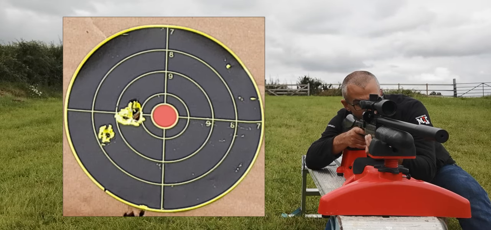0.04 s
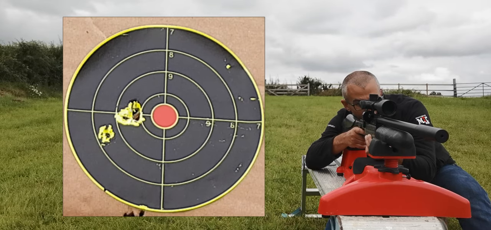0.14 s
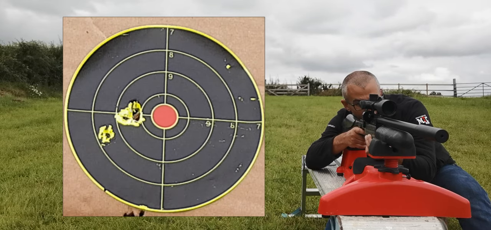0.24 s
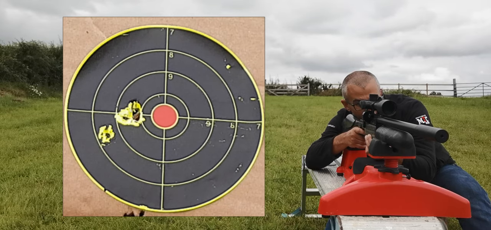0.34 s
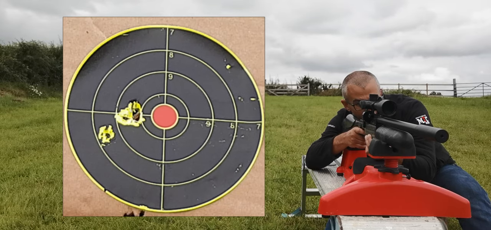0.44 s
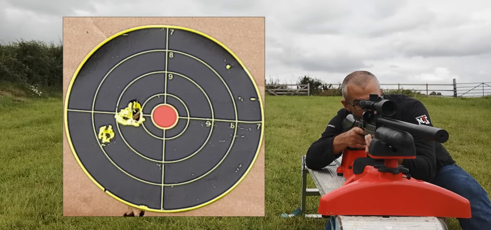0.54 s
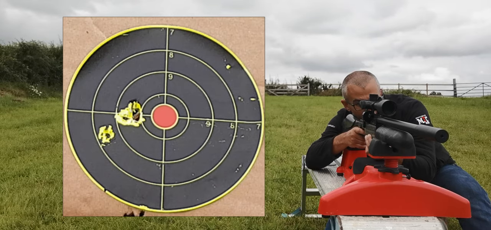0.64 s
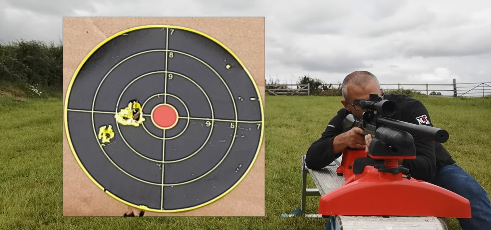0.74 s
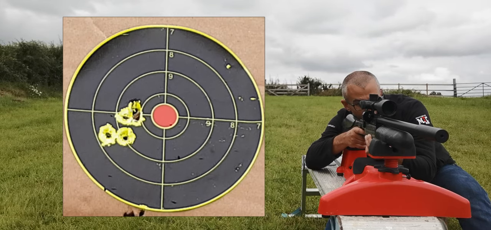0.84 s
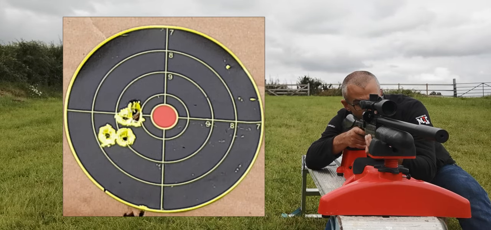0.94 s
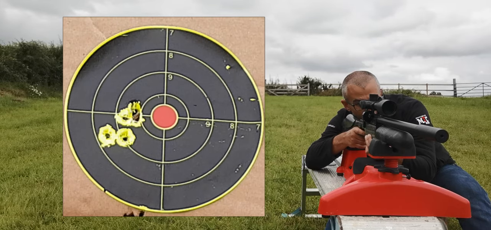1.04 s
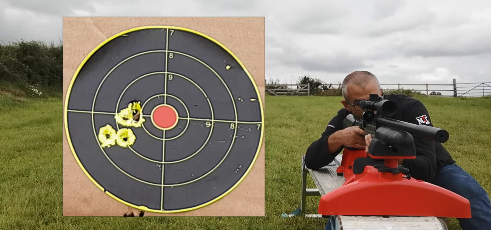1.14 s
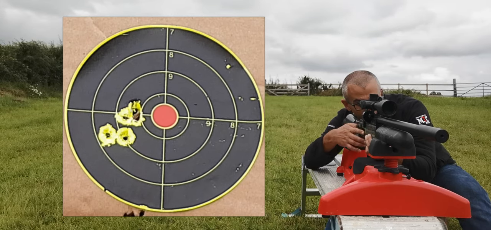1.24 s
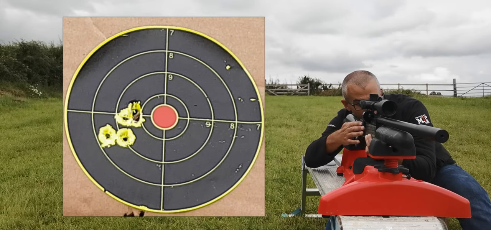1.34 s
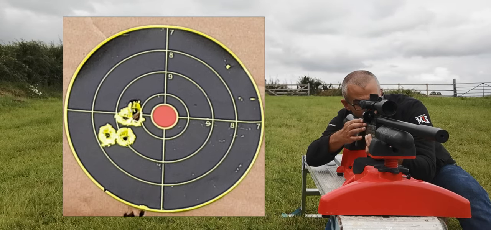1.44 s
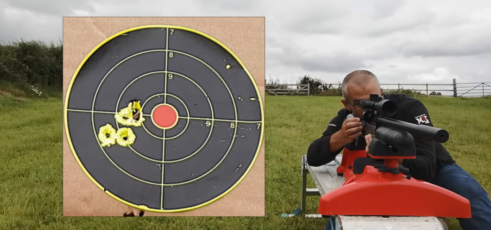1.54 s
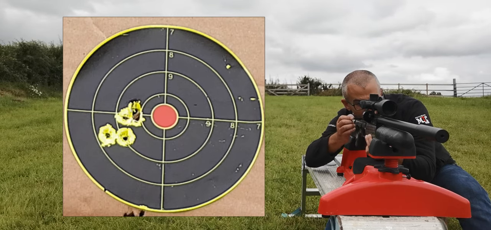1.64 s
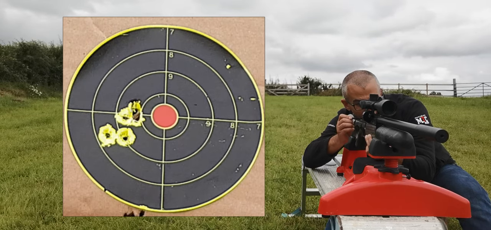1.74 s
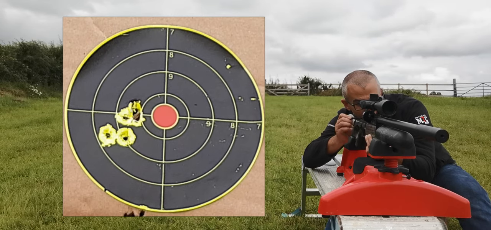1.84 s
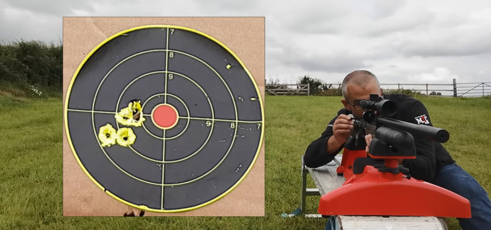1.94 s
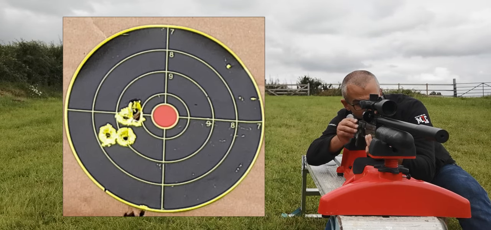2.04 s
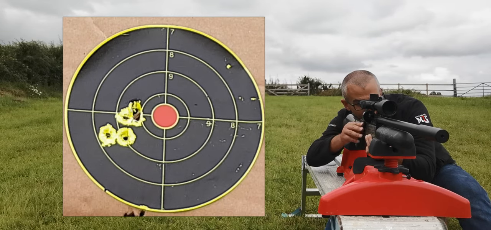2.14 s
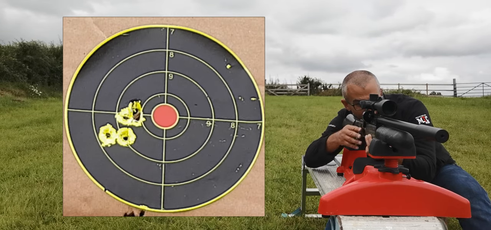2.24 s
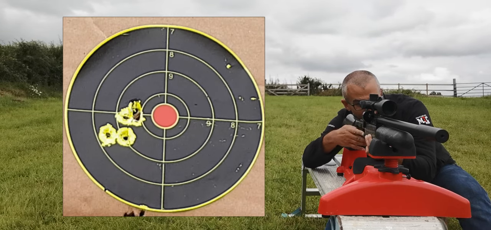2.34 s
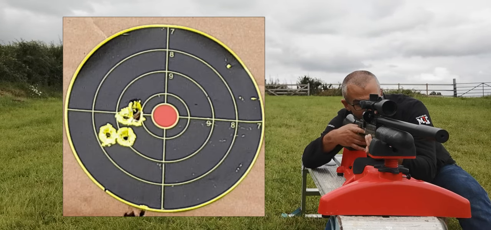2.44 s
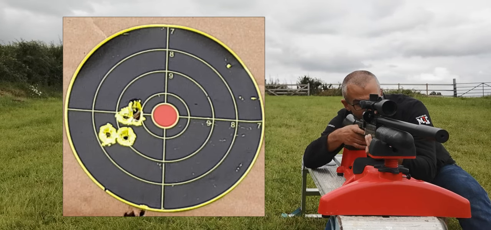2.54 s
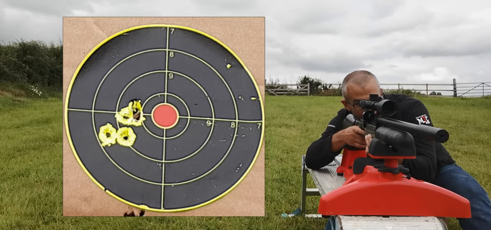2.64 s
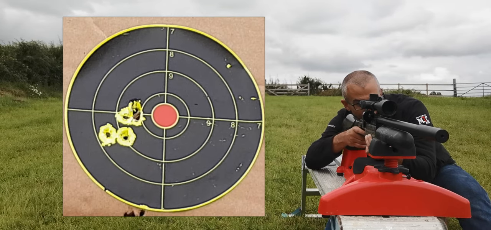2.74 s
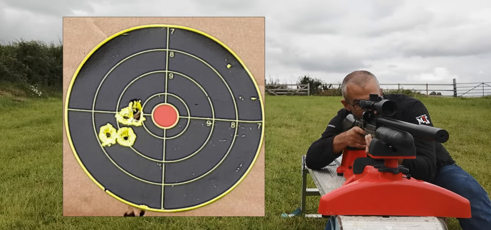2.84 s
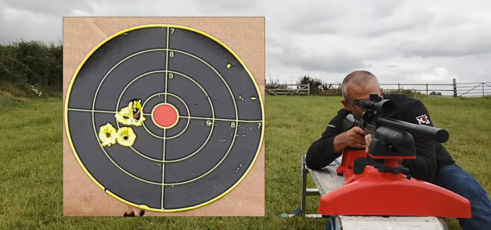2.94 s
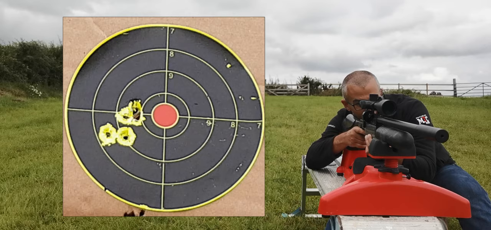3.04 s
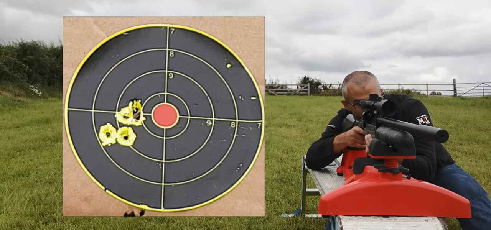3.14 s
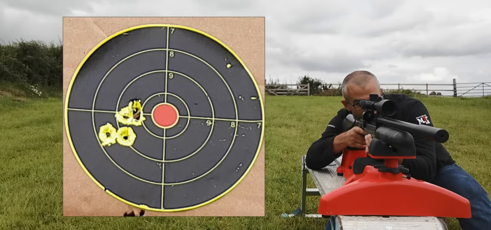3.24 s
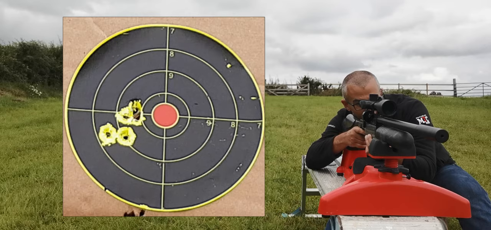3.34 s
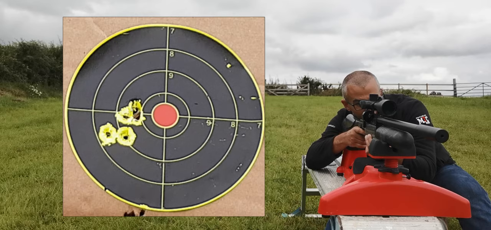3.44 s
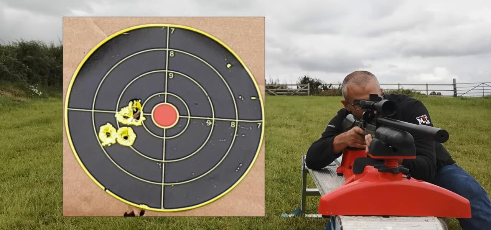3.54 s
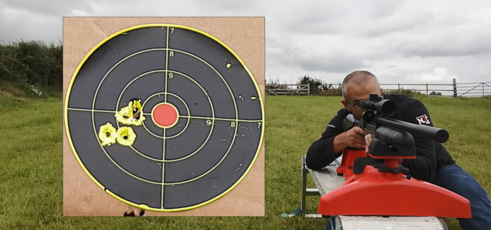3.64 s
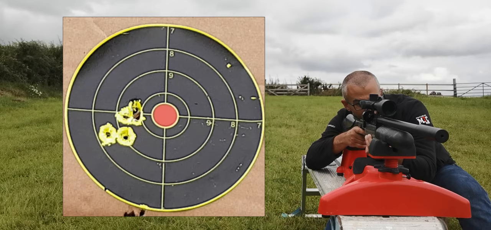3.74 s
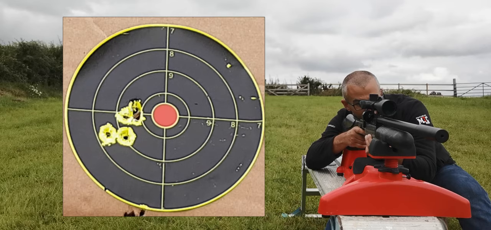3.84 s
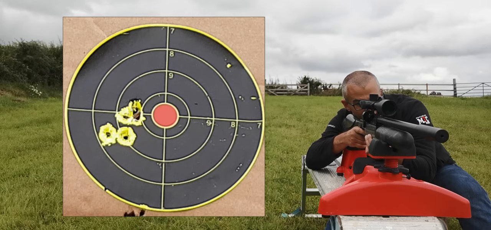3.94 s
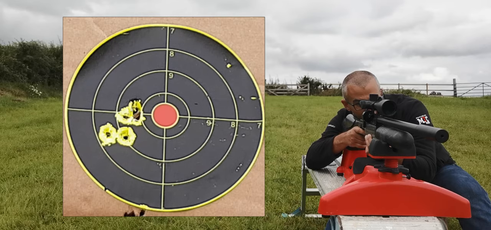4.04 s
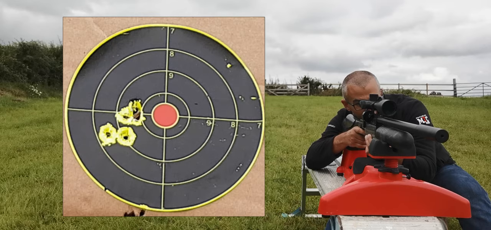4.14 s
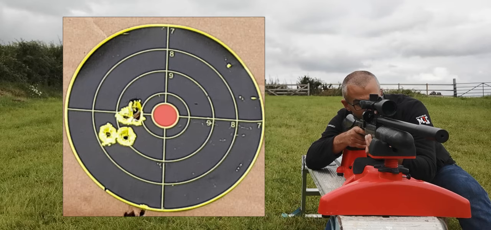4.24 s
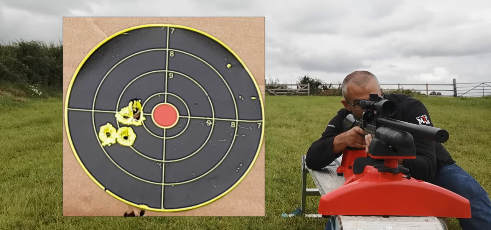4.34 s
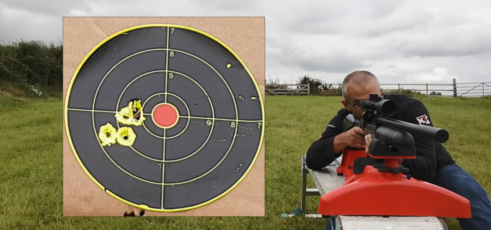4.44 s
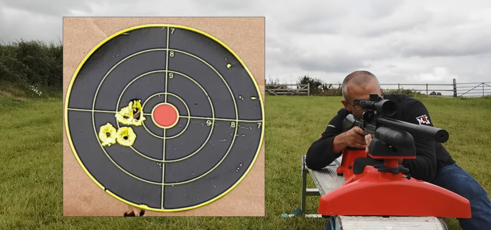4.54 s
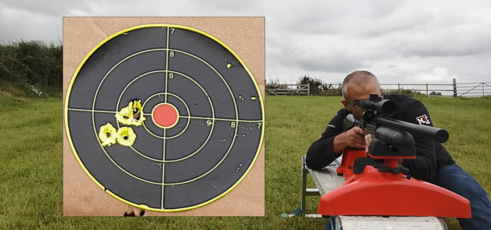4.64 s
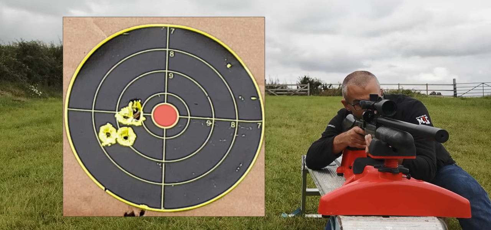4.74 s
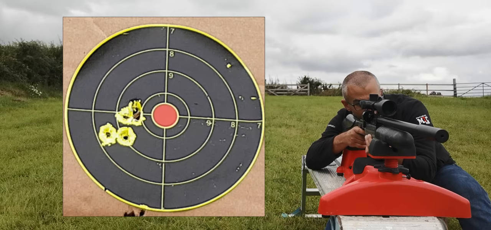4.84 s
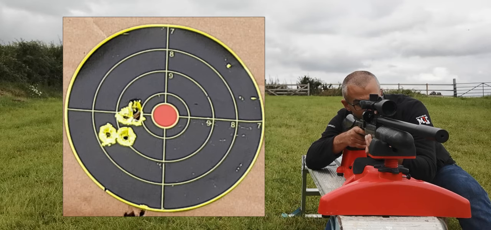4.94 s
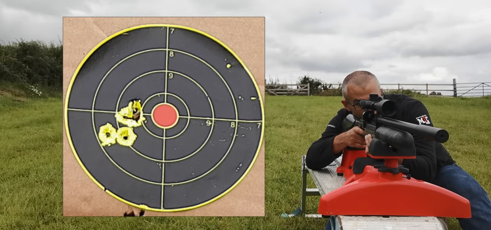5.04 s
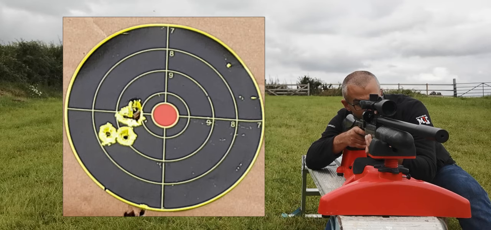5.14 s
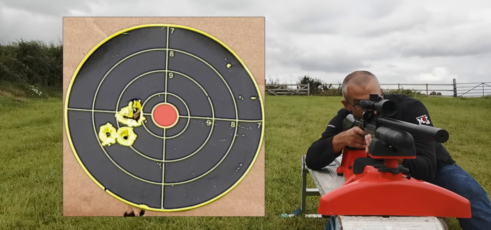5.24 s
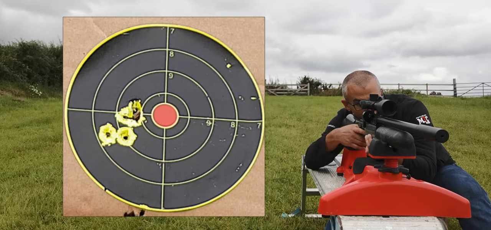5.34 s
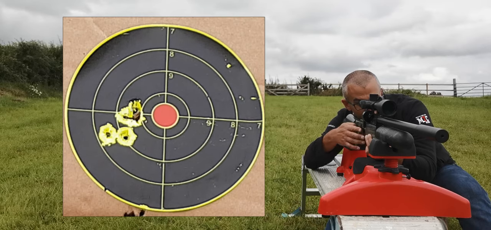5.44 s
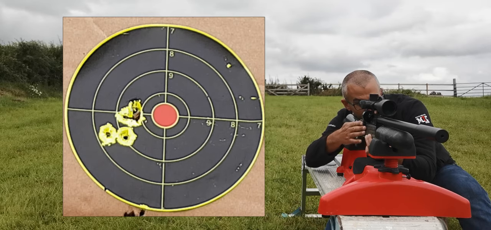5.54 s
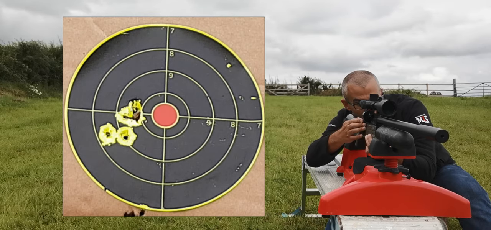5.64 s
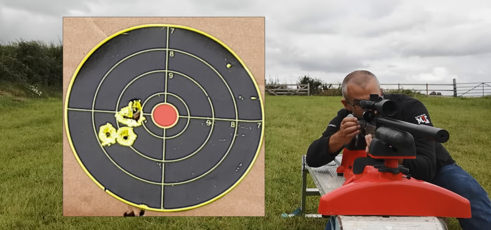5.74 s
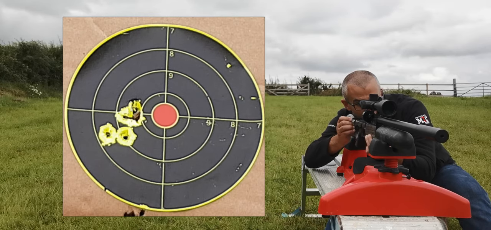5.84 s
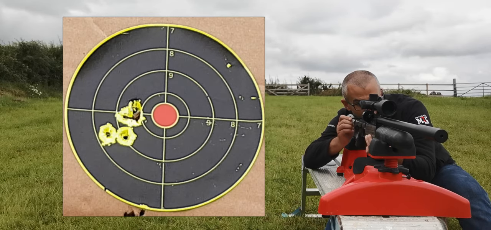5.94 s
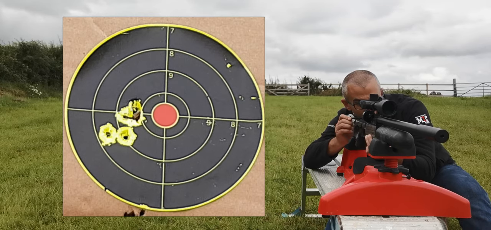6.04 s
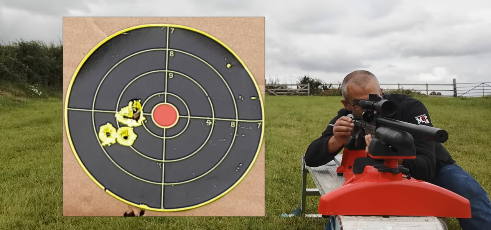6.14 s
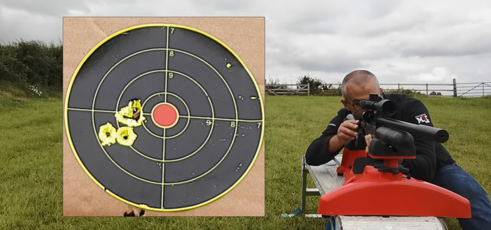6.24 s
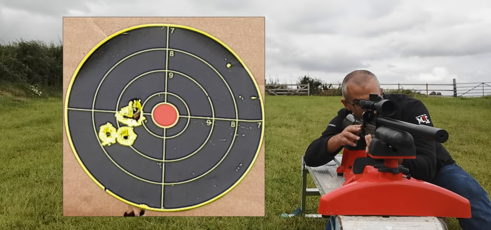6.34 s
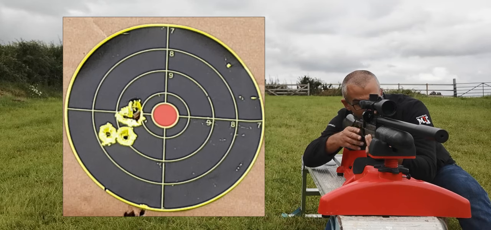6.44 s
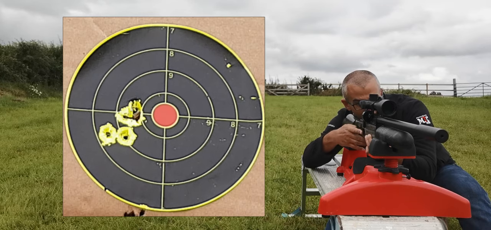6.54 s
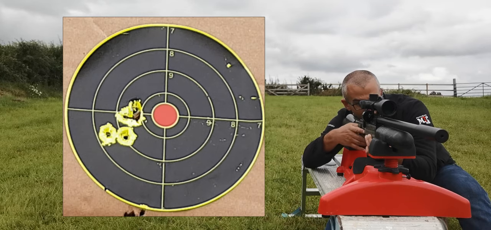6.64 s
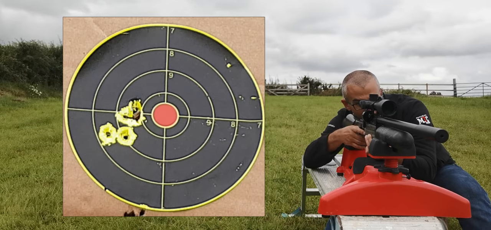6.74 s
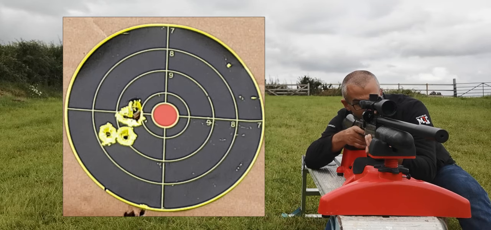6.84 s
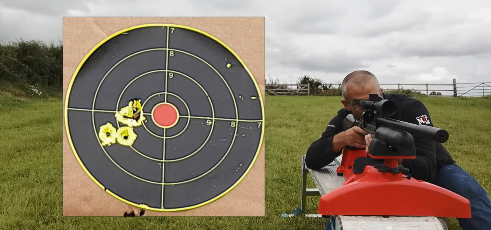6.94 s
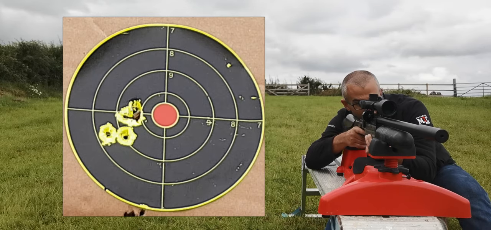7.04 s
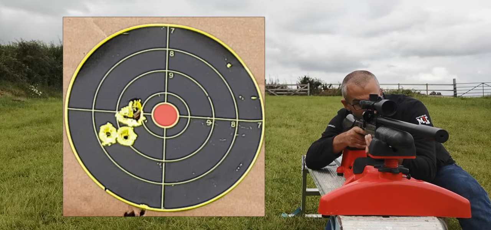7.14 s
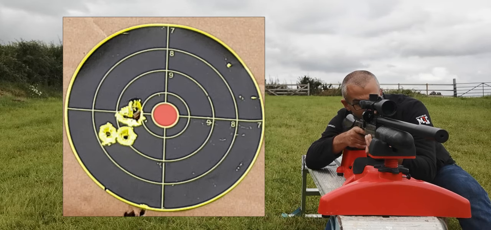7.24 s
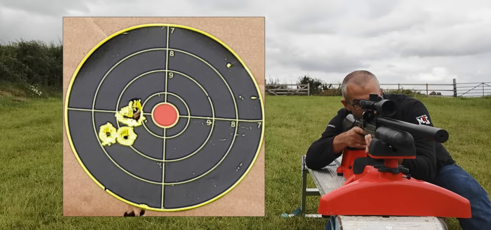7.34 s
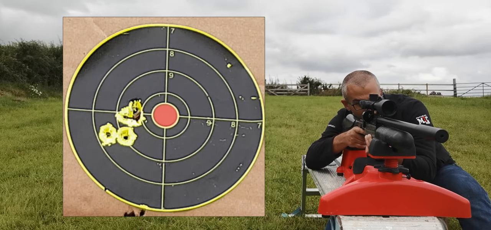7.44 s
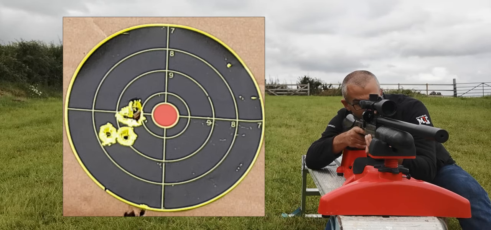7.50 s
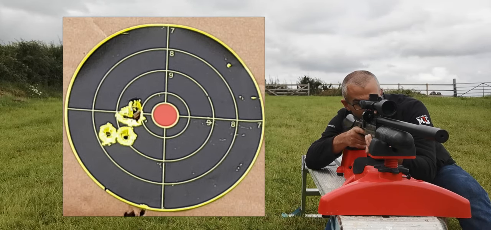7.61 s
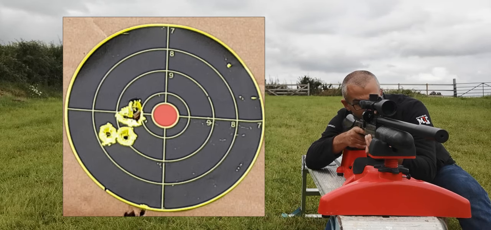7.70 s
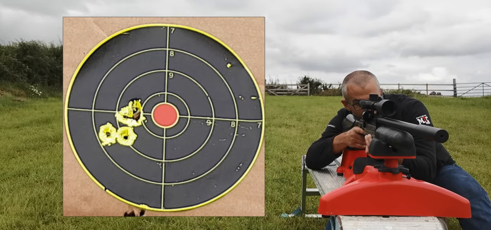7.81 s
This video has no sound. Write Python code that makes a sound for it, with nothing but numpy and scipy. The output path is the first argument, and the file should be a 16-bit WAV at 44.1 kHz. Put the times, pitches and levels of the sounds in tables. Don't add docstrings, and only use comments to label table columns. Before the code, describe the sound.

Two muffled air rifle shots, each followed at once by a booming metallic pellet-trap hit, with bolt clicks between and wind rumbling over an open field.

```python
import sys
import numpy as np
from scipy import signal
from scipy.fft import rfft, irfft, next_fast_len
from scipy.io import wavfile

SR = 44100
rng = np.random.default_rng(int(sys.argv[2]) if len(sys.argv) > 2 else 0)


def linear_from_db(decibels):
    return 10 ** (np.asarray(decibels, float) / 20)


def wrap_up_sound(samples):
    columns = np.atleast_2d(samples).T
    tamed = np.clip(columns, -1, 1)
    steps = np.round(tamed * 32767).astype(np.int16)
    wavfile.write(sys.argv[1], SR, steps)


N = 347067

# (blast time [s], valve tick [dB], sear tick [dB])
SHOTS = [
    (0.7053, -27.5, -50),
    (4.8423, -9, -34),
]
# (time after blast [ms], peak [dB], centre [Hz], t60 [ms], pan L-R [dB])
BLAST = [
    (0, -10.5, 4600, 13, -2),
    (-0.5, -8.5, 6230, 15, -12.5),
    (0, -16, 1290, 14.0, -1.5),
    (7, -30, 10500, 32.0, -4.5),
]
JET_WHISTLE = (1.2, -18.5, 14499.5, 10, -4)
# (time [s], peak [dB])
HAMMER = [
    (0.715, -22.5),
    (4.8504, -22),
]
# (frequency [Hz], level [dB], t60 [s])
TUBE = [(1350, -7.5, 0.02), (2745.7, -14, .04), (4164, -16.5, 0.14), (5340, -20, 0.05), (6780, -16, 0.083),
        (8412, -15, 0.028), (9524, -17, 0.047), (11100, -23.5, .03), (12525, -25, .06), (13900, -25, .036)]
# (time [s], peak [dB], t60 [ms], spring ring [dB])
BOLT = [(1.7491, -42, 27, -34), (1.756, -54, 120, -36), (1.7806, -56, 25, -32), (1.845, -52, 91, -24),
        (1.8606, -35.5, 23, -23.5), (1.873, -46, 33, -36), (1.8824, -42.5, 25, -19.5),
        (1.891, -56, 33, -36), (2.0184, -35.5, 23.4, -40), (2.0679, -38.5, 15, -28),
        (2.113, -51.5, 57, -18), (5.608, -39, 59, -36), (6.0222, -40.5, 28, -11.5), (6.1867, -34, 17, -32),
        (6.228, -45, 29, -19), (6.272, -54.5, 110, -32)]
LATCH_S = [2.2416, 6.4169]
# (time after latch [ms], peak [dB], centre [Hz], t60 [ms], spring ring [dB])
LATCH = [
    (-2.5, -32, 7200, 8.1, -16),
    (-1, -25.5, 5930, 25, -20.5),
    (6.5, -34, 5400, 5.5, -19),
    (58.5, -52.5, 3900, 55, -29),
]
# (frequency [Hz], level [dB], t60 [s])
ACTION = [(1730, 13, 0.014), (2250, 8, 0.012), (3240, -9, .01), (5200, -7.5, .11), (4800, -18, .06)]

PELLET_S = [0.849, 4.983]
# (time [s], mid [dB], low minus mid [dB], high minus mid [dB], decay factor [1])
TRAP_HITS = [
    (.849, -5, -9.5, -11, 0.74),
    (4.9734, -30, -6, -2, 0.93),
    (4.983, -7, -9.5, -10.5, 0.82),
    (5.2701, -48, -6, -3.5, 0.61),
    (5.3437, -43.5, 2, -10.5, 0.35),
    (5.5087, -39.5, -4, -30.5, 0.54),
    (5.608, -44, -7, -16, 0.53),
    (5.6704, -50, -9, -16, 0.38),
    (5.709, -56.5, 6.5, -9, .1),
    (5.8991, -30, -16, -21.5, 0.55),
]
# (time after arrival [ms], mid [dB], low minus mid [dB], high minus mid [dB], decay factor [1])
REPORT = [
    (0, -28, -23, -9.5, 0.13),
    (12, -42, -23, 2, .8),
]
# (time [s], mid [dB], low minus mid [dB], high minus mid [dB])
APPROACH = [
    (.79, -41, -14, -1.5),
    (.822, -38, -5, 2),
    (4.935, -40.5, -11.5, 0.5),
    (4.958, -29, -5, 3.5),
]
# (frequency [Hz], level [dB], t60 [s], left-right likeness [0..1])
TRAP = [(119.64, -13.5, .85, 0.85), (198, -8, 1, 0.39), (269.6, -8.5, 0.9, 1), (350, 2.5, 0.92, 0.74),
        (744, 2, 0.88, 0.63), (1090, 0, .65, 0.39), (2000, 3.5, 0.66, 0.45), (3800, -1.5, 0.51, 0.4),
        (6000, -1.5, 0.55, 0.1), (8500, -2.5, 0.31, .3), (11000, 0, .42, 0.085), (15500, -1, 0.33, 0.33)]
# (frequency [Hz], width [Hz], level [dB])
BOX = [(343, 40, 5), (528.3, 68, 4.5), (716, 50, 4), (758, 52, 6), (1160, 27, -0.5), (1415, 120, 5),
       (1903, 70, 3), (2650, 86, 5), (3110, 58, 3.5)]
# (frequency [Hz], first pellet [dB], second pellet [dB], t60 [s])
PANELS = [(266, -41.5, -43.5, 1.314), (347, -51, -45.5, 3.5), (472, -48.5, -55.5, 4.3),
          (510.7, -42, -30, 1.1), (532, -45.5, -35, 1.5), (584.6, -53, -39, 1.9), (618, -46, -53.5, 3.2),
          (748, -36.5, -42, .6), (772, -41, -41.5, 1.7), (1107.6, -39, -51.5, 1.1),
          (1360.4, -44.5, -46, 1.1), (1670, -43.5, -47.5, 0.66)]
# (frequency [Hz], level [dB], t60 [s])
PUNCH = [(205, -15.5, 0.041), (636, -12.5, .02)]
# (time [s], peak [dB], centre [Hz], t60 [ms])
KNOCKS = [
    (5.5089, -35.5, 1960, 70),
    (5.6085, -41, 5500, 20),
    (5.899, -24.5, 1580, 64),
    (5.55, -38, 820, 40),
]
# (time [s], low band [dB], middle band [dB], top band [dB], t60 [s])
FROM_AFAR = [
    (1.0065, -18, -14, -17.5, 0.45),
    (1.53, -55.5, -59, -69, 0.72),
    (1.621, -41, -52, -62, 0.28),
    (5.1415, -18.5, -20.5, -17.5, 0.44),
    (5.769, -49, -58, -55, 0.16),
    (6.041, -41.5, -52, -47.5, 0.19),
]

# (frequency [Hz], density [dB per Hz])
WIND_COLOUR = [(12, -36), (20, -2), (86, 1.5), (107, -2), (134, -1), (323, -24.5), (353, -18), (400, -21),
               (520, -51.5), (880, -120)]
# (time [s], rise over calm [dB], half length [s], pan L-R [dB])
GUSTS = [(.08, 11.5, 0.15, -5), (0.436, 11.5, 0.21, -5), (0.348, 9.5, 0.028, -0.5), (.78, 7.5, .12, 2),
         (1.082, 12.5, 0.11, -4), (2.518, 8, .27, 5.5), (3.35, 0, .06, -4), (3.797, 7, 0.23, -4),
         (4.547, 12, 0.25, -12), (4.668, 8, 0.015, -2.5), (4.756, 7, 0.031, 20), (5.16, 23, 0.12, -10.5),
         (5.688, -7, 0.14, -4), (6.014, 4, .06, -7), (6.779, -2.5, 0.088, 6), (7.001, 8, .07, 3),
         (7.274, 15.5, 0.13, 8), (7.5, 8, .12, 0), (7.8, 11.5, 0.18, 3)]
# (frequency [Hz], density [dB per Hz])
FIELD = [(120, -37.5), (200, -4), (254, -8.5), (434, -4.5), (542, -4.5), (728, -0.5), (860, -2), (997, -7),
         (1180, -6.5), (1900, -19), (3770, -30.5), (8650, -39), (15000, -34.5), (16500, -43.5)]
# (frequency [Hz], left-right likeness [0..1])
FIELD_LIKENESS = [(200, 0.22), (400, 0.79), (1400, .75), (2500, 0.19), (5000, .02)]

VALVE_LEAD_MS, SEAR_LEAD_MS = 2.2, 8.3
WARMING_PER_S, COLD_PITCH = 0.9, 0.98
BOLT_HZ, BOLT_PAN_DB = 5700, -6.5
GRAIN_S = 0.0016
RANGE_M, SOUND_M_PER_S = 20.15, 343
APPROACH_DECAY, APPROACH_RISE_MS, HIT_RISE_MS = 0.43, 18, 0.19
PATCH_S, PATCH_DB = 0.018, 1.5
AFAR_TOP_HZ, AFAR_RISE_MS = 7730, 0.43
EDDY_S, SWIRL_S, SWIRL_DB = 0.028, 0.062, 3
CALM_DB, FIELD_DB = -60, -53.5
DEEP_FOLLOWS, DEEP_HZ = 0.33, 45
BRIGHT_FOLLOWS, BRIGHT_HZ = 1.2, 140


def rifle():
    hammer_s = np.transpose(HAMMER)[0]
    push = ring(marks(hammer_s - 0.012, linear_from_db(-31.5)), 140, 0.035)
    push += ring(marks(hammer_s - 0.0095, linear_from_db(-26)), 480, 0.014)
    push += ring(marks(hammer_s - 0.009, linear_from_db(-25.5)), 1100, 0.015)
    rattles, jets = [], []
    for blast_s, valve_db, sear_db in SHOTS:
        rattles.append((blast_s - SEAR_LEAD_MS / 1000, sear_db, 5000, 22.0, -6))
        rattles.append((blast_s - VALVE_LEAD_MS / 1000, valve_db, 5000, 8.0, -8))
        rattles += [(blast_s + ms / 1000, *rest) for ms, *rest in BLAST]
        jets.append((blast_s + JET_WHISTLE[0] / 1000, *JET_WHISTLE[1:]))
    blasts = bursts(rattles, width_oct=0.6, top_hz=10700, rise_ms=0.3, grain_db=2.5)
    blasts += bursts(jets, width_oct=0.3, top_hz=16500, rise_ms=0.3, grain_db=1.0)
    return blasts + pan(air_tube(), -2.1) + pan(push, -8.5)


def air_tube():
    out, age_s = np.zeros(N), np.arange(SR // 5) / SR
    turns = COLD_PITCH * (age_s + WARMING_PER_S * age_s ** 2 / 2)
    modes = sum(linear_from_db(db + 4.5 - 60 * age_s / t60) * np.cos(2 * np.pi * hz * turns) for hz, db, t60 in TUBE)
    for s, peak_db in HAMMER:
        i = int((s + 0.00063) * SR)
        out[i:i + len(age_s)] += linear_from_db(peak_db) * modes
    return out


def bolt():
    rows = [(s, db, BOLT_HZ, t60_ms, BOLT_PAN_DB, ring_db) for s, db, t60_ms, ring_db in BOLT]
    for s in LATCH_S:
        rows += [(s + ms / 1000, db, hz, t60_ms, BOLT_PAN_DB, ring_db) for ms, db, hz, t60_ms, ring_db in LATCH]
    rows = np.array(rows)
    strikes = marks(rows[:, 0] + 0.00107, linear_from_db(rows[:, 1] + rows[:, 5]))
    rings = sum(linear_from_db(db) * ring(strikes, hz, t60) for hz, db, t60 in ACTION)
    clicks = bursts(rows, width_oct=0.53, top_hz=8600, rise_ms=0.41, grain_db=3.5)
    return clicks + pan(rings, -2.9)


def trap():
    hz, white = noise_pair(lambda f: at_hz(TRAP, f, axis=3), lag_s=0.00022)
    white = white * sheet_modes(hz, spacing_hz=22.27, depth_db=2.5)
    out, step = np.zeros((2, N)), 16
    t = np.arange(0, N + step, step) / SR
    sounds = trap_sounds()
    for centre in 110 * 2 ** np.arange(0, 7.3, 0.4):
        skirt = np.cos(np.clip(np.log2(hz / centre) / 0.4, -1, 1) * np.pi / 2)
        crack = linear_from_db(at_hz([(500, 1.0), (3000, 2.5), (11000, 6.5)], centre))
        bend = at_hz([(400, 1.3), (2500, 1.4), (9000, 1.0)], centre)
        band_db, band_t60 = at_hz(TRAP, centre), at_hz(TRAP, centre, axis=2)
        power = np.zeros(len(t))
        for s, mid_db, low_db, high_db, decay, rise_ms in sounds:
            tilt_db = at_hz([(600, low_db + 5.5), (3000, -2.5), (11000, high_db - 2.5)], centre)
            near = slice(int(s * SR / step), int((s + 1.5) * SR / step))
            tail = swell(t[near], s, decay * band_t60, rise_ms, bend)
            early = crack * swell(t[near], s, decay * 0.1115, rise_ms)
            power[near] += linear_from_db(2 * (mid_db + tilt_db + band_db)) * (tail ** 2 + early ** 2)
        power *= linear_from_db(2 * PATCH_DB * wander(t, PATCH_S)[0] - 1)
        envelope = np.interp(np.arange(N), t * SR, np.sqrt(power))
        out += envelope * irfft(white * skirt)[:, :N]
    return linear_from_db(4.8) * out


def trap_sounds():
    flight_s = RANGE_M / SOUND_M_PER_S
    rows = [(*row, HIT_RISE_MS) for row in TRAP_HITS]
    rows += [(*row, APPROACH_DECAY, APPROACH_RISE_MS) for row in APPROACH]
    for blast_s, *_ in SHOTS:
        rows += [(blast_s + flight_s + ms / 1000, *rest, max(HIT_RISE_MS, ms)) for ms, *rest in REPORT]
    return rows


def sheet_modes(hz, spacing_hz, depth_db):
    thicket = np.interp(hz, np.arange(3000) * spacing_hz, rng.standard_normal(3000))
    humps = sum(db / (1 + (2 * (hz - centre) / width) ** 2) for centre, width, db in BOX)
    return linear_from_db(depth_db * thicket + humps - 2)


def panels():
    out, knots = np.zeros(N), np.arange(0, N + 3000, 3000)
    for hz, first_db, second_db, t60 in PANELS:
        waver = linear_from_db(np.interp(np.arange(N), knots, 3.0 * rng.standard_normal(len(knots))))
        strikes = marks(PELLET_S, linear_from_db(np.array([first_db, second_db]) - 2.0))
        out += waver * ring(strikes, hz, t60)
    punches = marks(np.array(PELLET_S) - 0.0006, 0.88)
    out -= sum(linear_from_db(db) * ring(punches, hz, t60) for hz, db, t60 in PUNCH)
    return pan(out, -1.2)


def scraps():
    rows = [(*row, -1.5) for row in KNOCKS]
    return bursts(rows, width_oct=0.54, top_hz=12000, rise_ms=0.2, grain_db=2.0)


def from_afar():
    out, t = np.zeros((2, N)), np.arange(SR) / SR
    bands_hz = [[1100, 2760], [2700, 4600], [4200, AFAR_TOP_HZ]]
    for s, *levels_db, t60 in FROM_AFAR:
        noise = rng.standard_normal((3, 2, SR))
        i = int(s * SR)
        for part, edges, level_db, lasts in zip(noise, bands_hz, levels_db, [1.1, 0.85, 0.6]):
            band = signal.sosfilt(signal.butter(4, edges, "band", fs=SR, output="sos"), part)
            out[:, i:i + SR] += linear_from_db(level_db) * band * swell(t, 0, lasts * t60, AFAR_RISE_MS, bend=1.147)
    return out


def wind():
    t, sides = np.arange(N) / SR, np.array([[0.5], [-0.5]])
    hz, white = noise_pair(lambda f: 0 * f + 0.082, lag_s=0)
    colour_db = at_hz(WIND_COLOUR, hz) - 12 * np.log2(np.maximum(hz / 400, 1))
    white = white * linear_from_db(colour_db - 5 * np.log2(np.maximum(45 / hz, 1)))
    deep_share = 1 / (1 + (hz / DEEP_HZ) ** 4)
    bright_share = 1 - 1 / (1 + (hz / BRIGHT_HZ) ** 4)
    shares = (deep_share, 1 - deep_share - bright_share, bright_share)
    deep, upper, bright = (irfft(white * share)[:, :N] for share in shares)
    gust_db = 0
    for s, db, half_s, pan_db in GUSTS:
        gust_db = gust_db + (db + pan_db * sides) * np.exp(-np.abs((t - s) / half_s) ** 3)
    lumps = linear_from_db(4.5 * np.clip(wander(t, EDDY_S), -2, 2.2) + SWIRL_DB * wander(t, SWIRL_S))
    rumble = deep * linear_from_db(DEEP_FOLLOWS * gust_db + 3.0)
    rumble += upper * linear_from_db(gust_db)
    rumble += bright * linear_from_db(BRIGHT_FOLLOWS * gust_db - 1.5)
    calm_rms = np.sqrt(np.mean(((deep + upper + bright) * lumps) ** 2))
    return linear_from_db(CALM_DB) * rumble * lumps / calm_rms


def field():
    hz, white = noise_pair(lambda f: at_hz(FIELD_LIKENESS, f), lag_s=-0.00044)
    colour_db = at_hz(FIELD, hz) - 12 * np.log2(np.maximum(200 / hz, 1))
    return linear_from_db(FIELD_DB) * rms_one(irfft(white * linear_from_db(colour_db))[:, :N])


def ducking(depth_db, hold_s, recover_db_per_s):
    t, dip_db = np.arange(N) / SR, np.zeros(N)
    for s in PELLET_S:
        dip_db += np.clip(depth_db - recover_db_per_s * (t - s - hold_s), 0, depth_db) * (t > s)
    return linear_from_db(-dip_db)


def bursts(events, width_oct, top_hz, rise_ms, grain_db):
    out, t = np.zeros((2, N)), np.arange(3500) / SR
    lowpass = signal.butter(3, top_hz, fs=SR, output="sos")
    for s, peak_db, hz, t60_ms, pan_db, *_ in events:
        noise = rng.standard_normal((3, len(t)))
        edges = [hz * 2 ** -width_oct, min(hz * 2 ** (0.66 * width_oct), 19000)]
        rattle = (noise[0] + 0.7 * noise[1:]) * swell(t, 0, t60_ms / 1000, rise_ms, bend=1.4)
        rattle *= linear_from_db(grain_db * np.interp(t / GRAIN_S, np.arange(200), rng.standard_normal(200)))
        rattle = signal.sosfilt(signal.butter(2, edges, "band", fs=SR, output="sos"), rattle)
        rattle = signal.sosfilt(lowpass, rattle)
        side_db = pan_db * np.array([[0.5], [-0.5]])
        i = int(s * SR)
        out[:, i:i + len(t)] += rattle / np.abs(rattle).max() * linear_from_db(peak_db - 0.5 + side_db)
    return out


def ring(drive, hz, t60):
    r, w = linear_from_db(-60 / (t60 * SR)), 2 * np.pi * hz / SR
    return signal.lfilter([0, np.sin(w)], [1, -2 * r * np.cos(w), r * r], drive + 1e-18)


def swell(t, s, t60, rise_ms, bend=1):
    age_s = np.maximum(t - s, 0)
    return linear_from_db(-60 * (age_s / t60) ** bend) * (1 - np.exp(-age_s * 1000 / max(rise_ms, 0.2)))


def noise_pair(likeness, lag_s):
    size = next_fast_len(N)
    hz = np.maximum(np.arange(size // 2 + 1) * SR / size, 1)
    shared, left, right = rfft(rng.standard_normal((3, size)))
    alike = np.clip(likeness(hz), 0, 1)
    common, own = np.sqrt(alike) * shared, np.sqrt(1 - alike)
    delay = np.exp(-2j * np.pi * hz * lag_s)
    return hz, np.array([common * delay + own * left, common + own * right])


def wander(t, step_s):
    return np.array([np.interp(t / step_s, np.arange(600), draw) for draw in rng.standard_normal((2, 600))])


def marks(times, sizes):
    out = np.zeros(N)
    np.add.at(out, (np.asarray(times) * SR).astype(int), sizes)
    return out


def at_hz(points, hz, axis=1):
    points = np.array(points)
    return np.interp(np.log(hz), np.log(points[:, 0]), points[:, axis])


def rms_one(x):
    return x / np.sqrt(np.mean(x ** 2) + 1e-20)


def pan(x, db):
    return np.array([x * linear_from_db(db / 2), x * linear_from_db(-db / 2)])


def scene():
    near_rifle = rifle() + bolt()
    box = pan(1, -0.65)[:, None] * trap() + panels() + scraps() + from_afar()
    background = ducking(depth_db=7.5, hold_s=0.37, recover_db_per_s=9.5) * field()
    return near_rifle + box + wind() + pan(1, -1.8)[:, None] * background


def roll_off(x):
    return signal.sosfilt(signal.butter(12, 17000, fs=SR, output="sos"), x)


def record(dry):
    clipped = 0.84 * np.tanh(dry / 0.84)
    lowpass = signal.ellip(10, 0.3, 65, 16000, fs=SR, output="sos")
    return roll_off(signal.sosfilt(lowpass, clipped))


dry = scene()
out = record(dry)
wrap_up_sound(out)
```